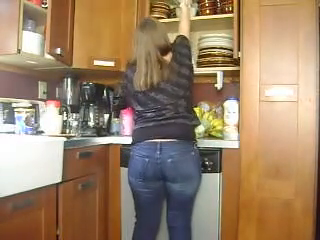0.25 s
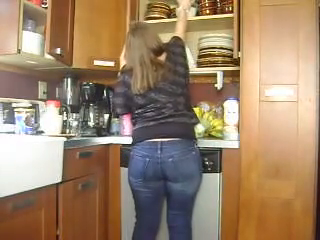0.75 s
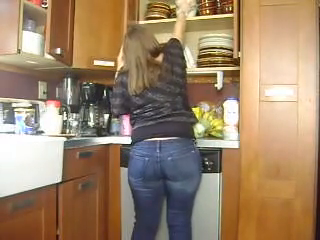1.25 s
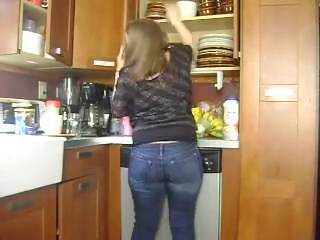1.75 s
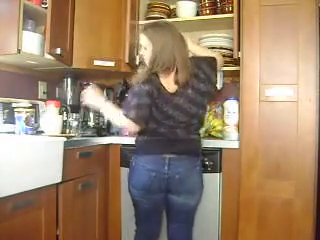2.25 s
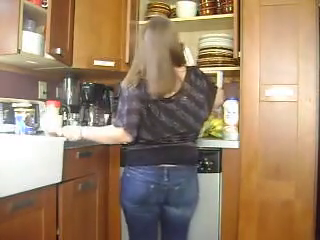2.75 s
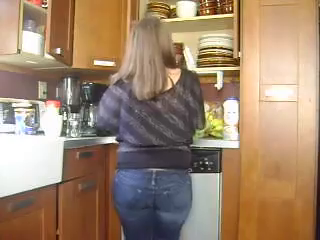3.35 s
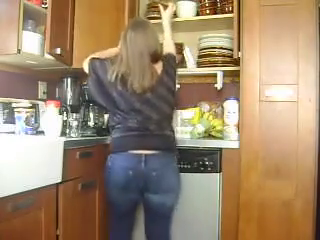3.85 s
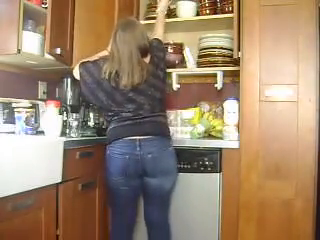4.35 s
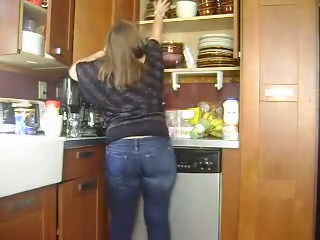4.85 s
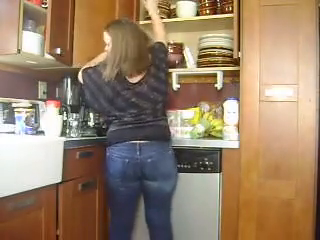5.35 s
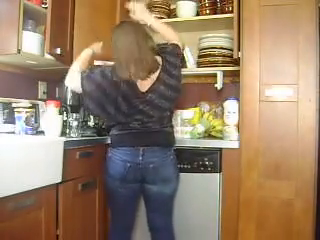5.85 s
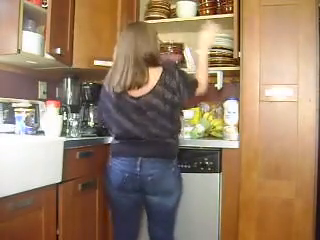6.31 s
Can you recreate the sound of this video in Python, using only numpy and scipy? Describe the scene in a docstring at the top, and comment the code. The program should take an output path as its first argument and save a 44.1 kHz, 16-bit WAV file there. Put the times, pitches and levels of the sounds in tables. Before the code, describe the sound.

Ceramic bowls, plates and a cup clink and clatter onto wooden cupboard shelves in a kitchen, loudest in a stack at about five seconds.

```python
"""A kitchen with hard walls: bowls, plates and a cup are lifted, slid and stacked on wooden cupboard shelves.
Each contact is a chatter of random rebounds that knocks the wood and rings the dish and shelf as decaying sines.
Drags are random grit impulses through the same wood and dish; the room answers with random-tap tails.
Low thuds of floor or counter are short booms; a refrigerator hums in wavering tones over a steady noise floor."""
import sys
import numpy as np
from scipy import signal
from scipy.fft import rfft, irfft
from scipy.io import wavfile
from scipy.ndimage import uniform_filter1d

SR = 44100
rng = np.random.default_rng(int(sys.argv[2]) if len(sys.argv) > 2 else 0)


def persist_wave(psi):
    """Save psi, clipped to +-1, as 16-bit WAV."""
    counts = np.round(np.clip(psi, -1, 1) * 32767).astype(np.int16)
    wavfile.write(sys.argv[1], SR, np.atleast_2d(counts).T)


def gain_from_db(level_db):
    """Convert decibel levels to linear amplitude factors (20 dB per decade)."""
    decades = np.asarray(level_db, float) / 20
    return 10 ** decades


N = 290178
FFT_SAMPLES, LEAD_SAMPLES = 2 ** 16, 512  # the lead leaves room for filter ripple ahead of a contact


def evened(x):
    """Scales to unit rms."""
    return x / np.sqrt(np.mean(x ** 2) + 1e-20)


def read(points, hz):
    """Straight lines on a log-frequency axis."""
    point_hz, value = np.transpose(points)
    return np.interp(np.log(hz + 1), np.log(point_hz + 1), value)


def add(mix, start_s, sound):
    """Adds a sound from start_s on, cut at the end of the mix."""
    part = mix[round(start_s * SR):][:len(sound)]
    part += sound[:len(part)]


# Modes of dishes damped by hands or neighbours.
# Each row: frequency in Hz, width in Hz before the grip factor, relative peak in dB.
HELD_BOWL_MODES = [(545, 30, -10), (760, 22, -1), (830, 22, -7), (928, 35, 0), (1105, 25, -5),
                   (1250, 25, -8), (1515, 45, -10), (1795, 37, -11), (3510, 60, -14), (3950, 90, -13)]
NESTED_BOWL_MODES = [(568, 30, -3), (950, 40, -7), (1250, 30, -9), (1435, 40, -6), (1650, 25, -11),
                     (1890, 25, -12), (2700, 35, -9), (3415, 40, -1), (3920, 60, -19), (4300, 32, -17),
                     (4630, 20, -14), (4765, 35, -10), (6265, 50, -24)]
RACK_PLATE_MODES = [(560, 40, -8), (760, 30, -4), (890, 40, 0), (1290, 45, 0), (1600, 20, -7),
                    (2000, 30, -8), (2470, 45, -9), (2580, 25, -10), (3340, 40, -10), (3975, 35, -10),
                    (4260, 60, -9), (5500, 60, -20)]
SLID_BOWL_MODES = [(576, 30, -8), (685, 30, -3), (945, 45, 0), (1113, 30, -5), (1560, 35, -2),
                   (2335, 45, -10), (2765, 34, -9), (2975, 40, -11), (3125, 35, -9), (4200, 50, -10),
                   (4785, 30, -9), (6245, 30, -24)]
STACK_MODES = [(571, 51, -9), (931, 49, -2), (1190, 35, 0), (1440, 44, -2), (1670, 15, -3), (2420, 48, -11),
               (2680, 190, -15), (2930, 34, -13), (3250, 93, -15), (3730, 22, -18), (4060, 18, -11),
               (4250, 51, -6), (4660, 240, -16), (4980, 21, -23), (6040, 28, -35), (6220, 150, -33)]
ROCKING_BOWL_MODES = [(581, 28, -9), (770, 29, -6), (931, 24, -6), (1190, 37, -2), (1400, 43, -5),
                      (1990, 110, -9), (2170, 15, -7), (2470, 140, -2), (2940, 62, -7), (3340, 18, -12),
                      (3910, 100, -4), (4240, 36, -1), (4770, 25, -8), (6260, 23, -25), (6440, 150, -32)]
SETTLING_BOWL_MODES = [(700, 47, -2), (1640, 42, 0), (2060, 27, -4), (2590, 38, -2), (3130, 40, -14),
                       (3400, 35, -7), (3890, 22, -10), (4050, 15, -6), (4300, 40, -1), (4470, 31, -14),
                       (4740, 30, -14), (4970, 83, -15), (5340, 32, -21), (5680, 94, -24)]
# Modes of dishes that ring free. Each row: frequency in Hz, width in Hz, relative peak in dB.
CUP_MODES = [(716, 20, -4), (746, 20, -5), (1433, 20, -3), (1850, 30, -6), (2756, 18, -6), (2934, 12, -11),
             (4542, 14, 0), (4624, 10, 3), (6417, 14, -11)]
FREE_BOWL_MODES = [(1017, 2.5, 0), (1026, 7, -14), (2546, 4, -32), (4570, 3, -36)]
BIG_BOWL_MODES = [(335, 10, -12), (420, 1.2, 0), (431, 2, -5), (545, 6, -16), (770, 8, -16), (966, 6, -16)]
# Long beating ring of the racked plate. Each row: frequency in Hz, width in Hz, relative peak in dB.
RACK_PLATE_LONG_MODES = [(1734, 2.2, 2), (1862, 2.2, 1), (1867.5, 2.6, -2), (4300, 5, -14)]
# Cloth brushing the shelf edge. Each row: frequency in Hz, width in Hz, relative peak in dB.
SLEEVE_MODES = [(1120, 650, 3), (1630, 1340, 3.5), (3160, 2100, 6)]


def modes_of(dish):
    """Hands and neighbouring dishes widen the modes of a damped dish, so they die sooner."""
    grip_factor = 3.0
    damped = {"held": HELD_BOWL_MODES, "nested": NESTED_BOWL_MODES, "plate": RACK_PLATE_MODES,
              "slid": SLID_BOWL_MODES, "stack": STACK_MODES, "rocking": ROCKING_BOWL_MODES,
              "settling": SETTLING_BOWL_MODES}
    undamped = {"cup": CUP_MODES, "free": FREE_BOWL_MODES, "big": BIG_BOWL_MODES,
                "glass": RACK_PLATE_LONG_MODES,  # the table key for the plate's long ring
                "sleeve": SLEEVE_MODES}
    if dish in undamped:
        return undamped[dish]
    return [(hz, grip_factor * width_hz, db) for hz, width_hz, db in damped[dish]]


def ring_spectrum(modes):
    """Decaying sines at unit energy; they swell in over a few milliseconds, for a soft onset."""
    rise_s = 0.005  # time constant
    t = np.arange(FFT_SAMPLES // 2) / SR
    ring = np.zeros(len(t))
    for k, (hz, width_hz, db) in enumerate(modes):
        decay = np.exp(-np.pi * width_hz * t)
        ring += (-1) ** k * gain_from_db(db) * width_hz * decay * np.sin(2 * np.pi * hz * t)
    ring *= 1 - np.exp(-t / rise_s)
    return rfft(ring / np.linalg.norm(ring), FFT_SAMPLES)


# Spectrum of contact and shelf wood. Each row: frequency in Hz, relative density in dB.
KNOCK_SPECTRUM = [(120, -15.5), (250, -15.5), (700, -4.5), (1200, -2), (2100, -6.5), (3500, -15),
                  (4600, -13.5), (5400, -25.5), (6900, -40.5), (8000, -64.5)]
# Mode of the board under the dishes. One row: frequency in Hz, width in Hz, base level in dB.
SHELF_MODE = (255.4, 54, -25)


def sound_of(force, ring_force, ring, treble_db, shelf_db, ring_db):
    """A force knocks the wood and rings dish and shelf; a harder contact gives more treble."""
    hz = np.fft.rfftfreq(FFT_SAMPLES, 1 / SR)
    knock = gain_from_db(read(KNOCK_SPECTRUM, hz))
    knock /= np.sqrt(np.mean(knock ** 2))
    hardness = gain_from_db(read([(1500, 0), (4000, treble_db), (6500, 1.2 * treble_db)], hz))
    highpass = 1 / (1 + (170 / (hz + 1)) ** 4)  # keeps deep bass out of the contacts
    shelf = gain_from_db(SHELF_MODE[2] + shelf_db) * ring_spectrum([SHELF_MODE])
    knocked = rfft(force, FFT_SAMPLES) * knock
    rung = rfft(ring_force, FFT_SAMPLES) * (gain_from_db(ring_db) * ring + shelf)
    return np.roll(irfft((knocked + rung) * hardness * highpass), LEAD_SAMPLES)


def hit(ring, rebound, db, chatter_s, *colour):
    """Random rebounds swell and die over the chatter time; they share the ringing with the first touch."""
    n = 8000
    swell_share = 0.39  # of the chatter time
    t = np.arange(n) / SR
    chatter_s = max(chatter_s, .002)
    swell = np.exp(-t / chatter_s) * (1 - np.exp(-t / (swell_share * chatter_s)))
    force = rng.standard_normal(n) * (rng.random(n) < .25) * swell
    force /= np.linalg.norm(force)
    touch = rebound * force
    touch[0] = 1
    touch /= np.linalg.norm(touch)
    sound = sound_of(force, touch, ring, *colour)
    peak_rms = np.sqrt(uniform_filter1d(sound ** 2, 400).max())
    return gain_from_db(db) * sound / peak_rms


# Touches of dish and shelf. Each row: start in seconds, peak short-time rms in dB, chatter in seconds,
# treble at 4 kHz in dB, ring against knock in dB, dish.
CONTACTS = [(0.111, -46, .02, -10, -14.5, "held"), (0.231, -44.5, 0.013, -32, 5, "held"),
            (0.307, -46.5, .016, -16, 0.5, "held"), (0.374, -33, 0.05, -6, -14.5, "held"),
            (0.412, -16.5, 0.017, -5.5, 7.5, "held"), (0.444, -34.5, 0.05, 0.5, -1.5, "held"),
            (0.627, -26, .011, -10.5, -4, "held"), (0.658, -31.5, 0.043, -5, 5, "held"),
            (0.704, -22.5, 0.0042, -20, 20, "held"), (0.733, -34.5, 0.0043, -24, -3.5, "held"),
            (0.746, -29.5, 0.0083, -8, 20, "free"), (0.979, -43.5, 0.023, 1, 5.5, "held"),
            (1.208, -27.5, 0.014, -2, 4, "cup"), (1.244, -37, 0.006, -26, 4.5, "cup"),
            (1.275, -44.5, .0057, 2, -2.5, "cup"), (1.394, -22.5, 0.027, -0.3, -12, "nested"),
            (1.404, -17, 0.019, 1.5, 13, "nested"), (1.469, -28, 0.024, 2.5, -13.5, "nested"),
            (1.5, -32, 0.019, 1.1, -22.5, "nested"), (1.97, -58.5, 0.024, -7, 4, "held"),
            (2.187, -42.5, 0.02, -9, 10.5, "held"), (2.441, -42.5, 0.028, -28, 4, "plate"),
            (2.629, -17, 0.027, -6.5, -1.5, "plate"), (2.654, -16, 0.011, -9, -11, "plate"),
            (2.667, -35, .014, -1, 18.5, "glass"), (2.675, -22, 0.0048, 6, 0, "plate"),
            (3.75, -51.5, 0.016, -20, -6, "held"), (4.043, -51.5, 0.023, -3, -18.5, "held"),
            (4.272, -41.5, 0.016, 19, -11, "slid"), (4.428, -36.5, 0.0084, -20.5, -7, "slid"),
            (4.441, -22, 0.033, 2, 1, "slid"), (4.857, -9, 0.018, 0.5, -3.2, "stack"),
            (4.889, -13.5, 0.016, 0.5, 14, "stack"), (4.955, -28, 0.025, 3, -5.5, "slid"),
            (5.0, -35.5, .03, 19, 2, "slid"), (5.035, -17.5, 0.017, 6.5, -7.5, "rocking"),
            (5.094, -13, 0.02, 5, 0.5, "rocking"), (5.12, -28, .018, 6.5, -4, "rocking"),
            (5.244, -19.5, 0.019, 3.5, -11, "settling"), (5.269, -23.5, 0.027, -2, -3.5, "settling"),
            (5.299, -33, 0.099, -12, 2.5, "settling"), (5.36, -44, 0.018, -7.5, 13, "big"),
            (5.599, -45.5, 0.011, 3, 18, "big"), (5.858, -47, 0.019, -26, 8, "big"),
            (6.058, -57.5, .015, -7, 13, "big")]
# Shelf ring on top of its base level. Each entry: dish, offset in dB.
SHELF_OFFSET_DB = {"held": 12, "nested": 11, "plate": -6.5, "slid": -12, "stack": -8, "rocking": -1,
                   "settling": 5, "cup": 8, "free": -2, "glass": -9, "big": 7}


def contacts(names, rebound):
    """Every blow of the named dishes; rebound weighs the chatter against the first touch in driving the ring."""
    mix = np.zeros(N + LEAD_SAMPLES)
    for name in names:
        ring = ring_spectrum(modes_of(name))
        for start_s, db, chatter_s, treble_db, ring_db, dish in CONTACTS:
            if dish == name:
                sound = hit(ring, rebound, db, chatter_s, treble_db, SHELF_OFFSET_DB[dish], ring_db)
                add(mix, start_s, sound)
    return mix[LEAD_SAMPLES:]


def damped_dishes():
    """Held and stacked dishes, whose widened modes die fast."""
    return contacts(["held", "nested", "plate", "slid", "stack", "rocking", "settling"], rebound=0.72)


def cup():
    """A cup rings with its own undamped modes."""
    return contacts(["cup"], rebound=0.5)


def singing_dishes():
    """Free bowl, plate ring and big bowl: narrow modes ring long; played dry, which keeps their level steady."""
    return contacts(["free", "glass", "big"], rebound=0.25)


# Drags over wood, and a sleeve over the shelf edge.
# Each row: start in seconds, length in seconds, first force level in dB, last force level in dB, dish.
DRAGS = [(0.0, 0.23, -54.5, -58, "held"), (4.504, .15, -42, -47, "slid"), (4.64, .21, -46, -40, "slid"),
         (5.525, 0.25, -42, -65, "sleeve")]
# Hardness of the rubbing. Each entry: dish, treble at 4 kHz in dB.
DRAG_TREBLE_DB = {"held": 1.5, "slid": -3, "sleeve": -10}
# Share of ringing in the rubbing. Each entry: dish, ring against knock in dB.
DRAG_RING_DB = {"held": -20, "slid": 3.4, "sleeve": 10.5}


def drags():
    """Grit catches at random under the moving dish or cloth while its level slides evenly in dB."""
    grit_per_s = 2200
    mix = np.zeros(N + LEAD_SAMPLES)
    for start_s, length_s, first_db, last_db, dish in DRAGS:
        n = round(length_s * SR)
        grit = rng.standard_normal(n) * (rng.random(n) < grit_per_s / SR)
        pressure = gain_from_db(np.linspace(first_db, last_db, n)) * signal.windows.tukey(n, .06)
        force = evened(grit) * pressure
        ring = ring_spectrum(modes_of(dish))
        add(mix, start_s, sound_of(force, force, ring, DRAG_TREBLE_DB[dish], 0, DRAG_RING_DB[dish]))
    return mix[LEAD_SAMPLES:]


# Room decay. Each row: frequency in Hz, t60 in seconds.
KITCHEN_T60 = [(150, 0.41), (400, 0.46), (1040, 0.42), (2760, 0.37), (6000, 0.32)]


def kitchen(x):
    """Three tails of sparse random taps, weighted in turn 7 times a second; each band dies at its own speed."""
    level_db, spacing, swing_hz = -0.5, 20, 7  # spacing in samples
    taps = np.zeros((3, SR))
    slots = np.arange(200, SR - spacing, spacing)
    at = slots + rng.integers(0, spacing, (3, len(slots)))
    np.put_along_axis(taps, at, rng.choice([-1., 1.], (3, len(slots))), 1)
    hz, t, z = signal.stft(taps, SR, nperseg=256)
    decay = gain_from_db(-60 * t / read(KITCHEN_T60, hz)[:, None])
    tails = signal.istft(z * decay, SR, nperseg=256)[1]
    tails /= np.linalg.norm(tails[0])
    cycles = swing_hz * np.arange(N) / SR + np.arange(3)[:, None] / 3
    feeds = x * np.cos(2 * np.pi * cycles) * np.sqrt(2 / 3)
    return gain_from_db(level_db) * signal.fftconvolve(feeds, tails, axes=1)[:, :N].sum(0)


# Low thuds, heard as weight on floor or counter.
# Each row: start in seconds, boom level in dB, boom in Hz, boom t60 in seconds.
THUDS = [(2.64, -41, 140, .25), (3.681, -34, 161, 0.05), (5.139, -45.5, 91.6, 0.065),
         (6.518, -41.5, 160, 0.044)]


def thuds():
    """Low thuds of floor or counter: a slow lump of pressure and a short boom."""
    mix, t = np.zeros(N), np.arange(SR // 4) / SR
    onset = 1 - np.exp(-t / 0.0011)
    push = 0.096 * gain_from_db(-60 * t / 0.1) * np.sin(2 * np.pi * 38 * t)
    for start_s, db, hz, t60_s in THUDS:
        tones = np.sin(2 * np.pi * hz * t) + 0.39 * np.sin(2 * np.pi * 1.7 * hz * t)
        boom = gain_from_db(-60 * t / t60_s) * tones
        add(mix, start_s, gain_from_db(db) * onset * (boom + push))
    return mix


# Motor tones. Each row: frequency in Hz, level in dB rms, width of each noise pole in Hz.
HUM_TONES = [(233.5, -66, 13), (465.5, -64.5, 8.7), (1069, -60, 0.67), (1120, -73.5, 5.6), (1250, -74, 11)]


def refrigerator():
    """Wavering motor tones: a steady sine with a narrow band of noise around it."""
    t, out = np.arange(N) / SR, np.zeros(N)
    for hz, db, width_hz in HUM_TONES:
        r = np.exp(-np.pi * width_hz / SR)
        noise = rng.standard_normal((N, 2)) @ [1, 1j]
        waver = signal.lfilter([1], [1, -2 * r, r * r], noise)
        tone = (1.5 + waver / waver.std()) * np.exp(2j * np.pi * hz * t)
        out += gain_from_db(db) * evened(tone.real)
    return out


# Spectrum of the noise floor. Each row: frequency in Hz, relative density in dB.
AIR_SPECTRUM = [(12, -63.5), (20, -23), (59, -10.5), (160, -12), (231, -4), (367, -3.5), (469, -9),
                (530, -0.5), (977, -4), (1080, -2.5), (1190, -5.5), (2140, -15.5), (4910, -18), (5970, -29),
                (6910, -49), (8980, -66.5), (15200, -120)]


def room_tone():
    """Steady noise from random short-time spectra with faint drifting patches."""
    level_db, patch_db = -52.5, 1.2  # both rms
    frames, hz = N // 256 + 5, np.fft.rfftfreq(1024, 1 / SR)
    real, imaginary, patches = rng.standard_normal((frames, 513, 3)).T
    patches = evened(uniform_filter1d(uniform_filter1d(patches, 10, 0), 20, 1))
    z = (real + 1j * imaginary) * gain_from_db(read(AIR_SPECTRUM, hz)[:, None] + patch_db * patches)
    noise = signal.istft(z, nperseg=1024, noverlap=768)[1][:N]
    return gain_from_db(level_db) * evened(noise)


def scene():
    """Dishes and thuds in the kitchen, over its steady tone."""
    dry = damped_dishes() + cup() + drags() + thuds()
    mix = dry + kitchen(dry) + singing_dishes() + refrigerator() + room_tone()
    return mix[None]


def roll_off(x):
    """The treble ends steeply here."""
    return signal.sosfilt(signal.butter(12, 7060, fs=SR, output="sos"), x)


def record(dry):
    """The microphone amplifier rounds loud peaks; then a narrow-band channel, faint hiss and a hard clip."""
    edge_hz, hiss_db = 6880, -94
    rounded = 1.5 * np.tanh(dry / 1.5)
    lowpass = signal.firwin(301, edge_hz, window=("kaiser", 8), fs=SR)
    narrow = signal.oaconvolve(rounded, lowpass[None], "same")
    hiss = gain_from_db(hiss_db) * rng.standard_normal(dry.shape)
    return roll_off(np.clip(narrow + hiss, -1, 1))


dry = scene()
out = record(dry)
persist_wave(out)
```